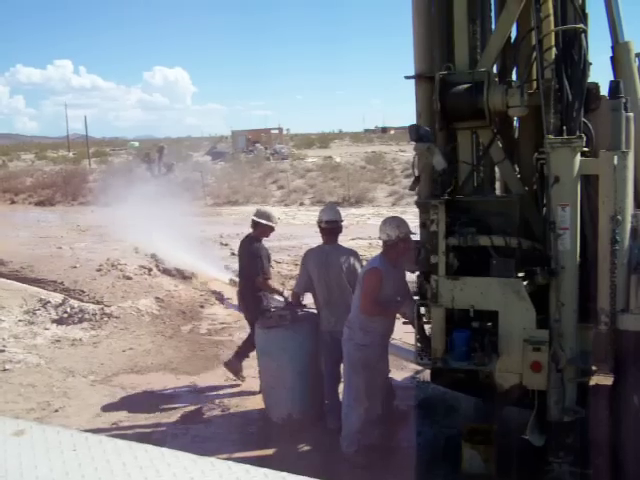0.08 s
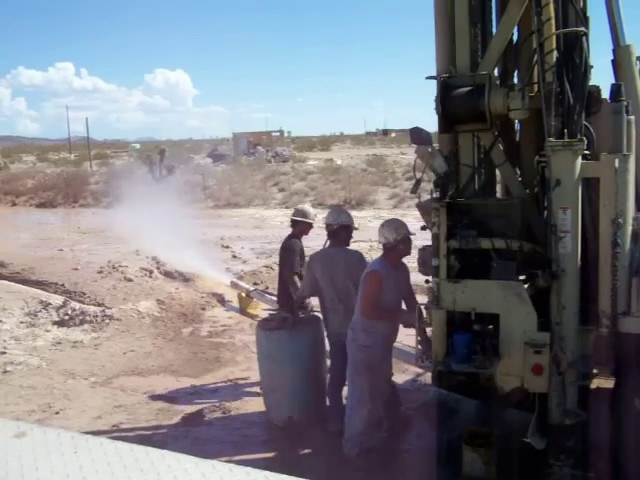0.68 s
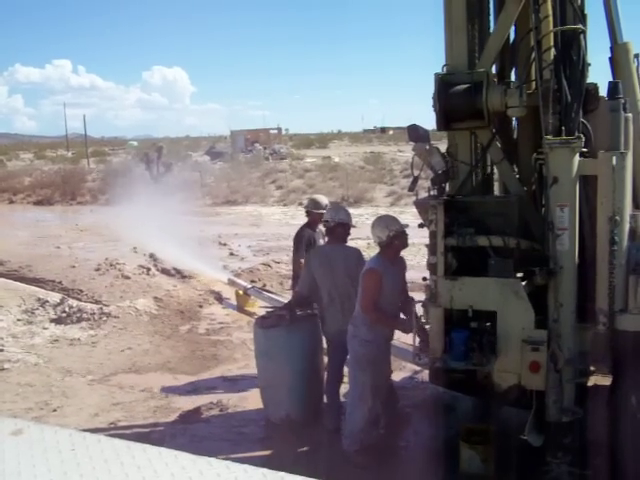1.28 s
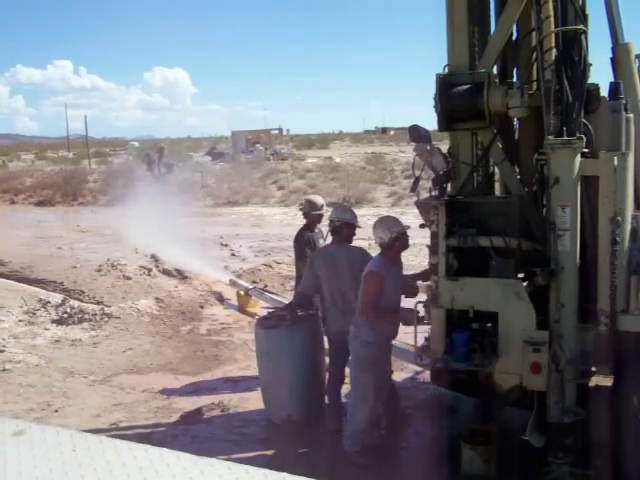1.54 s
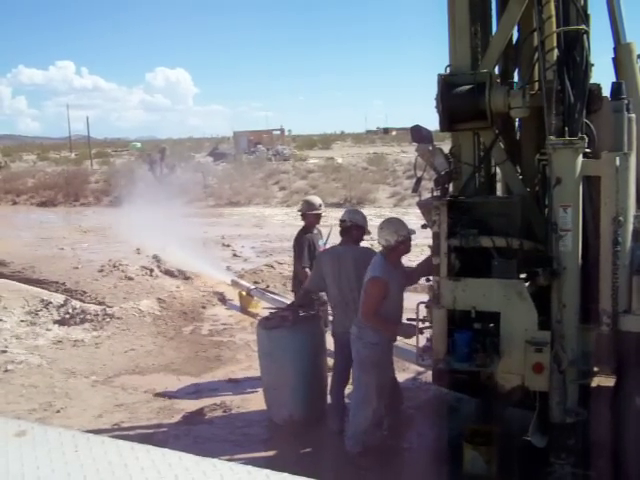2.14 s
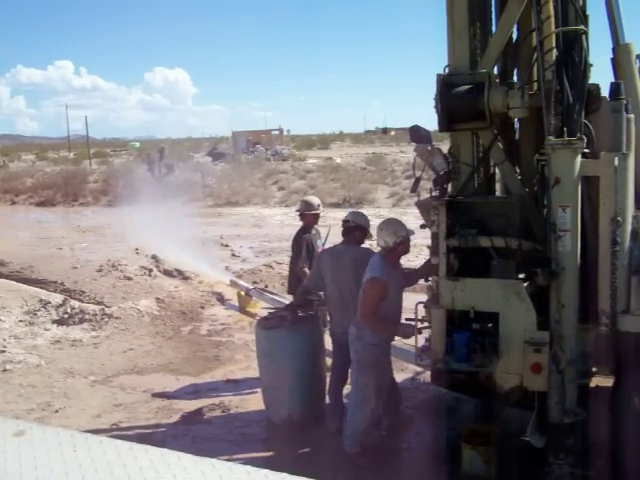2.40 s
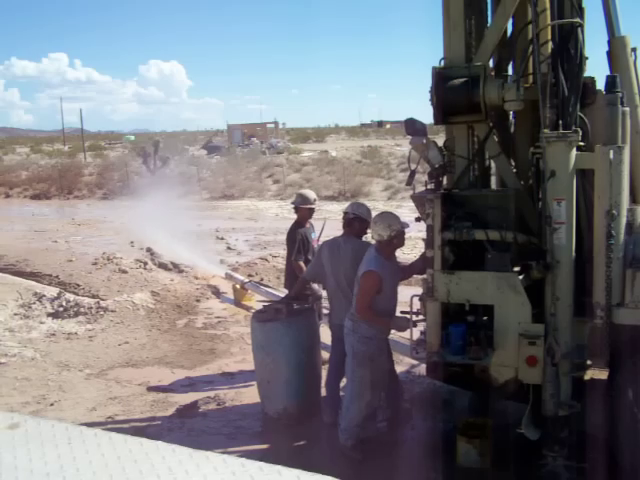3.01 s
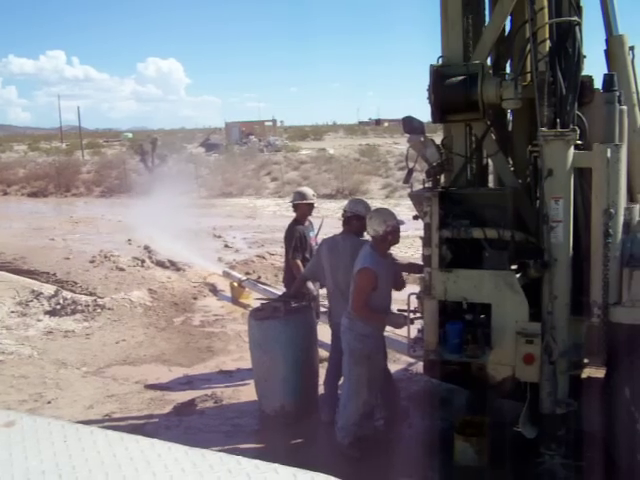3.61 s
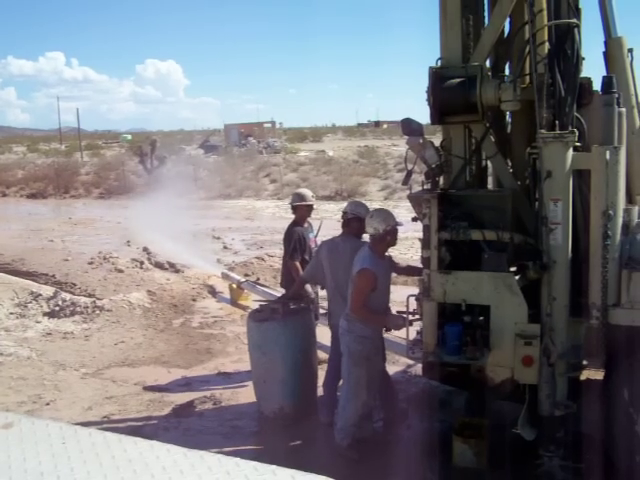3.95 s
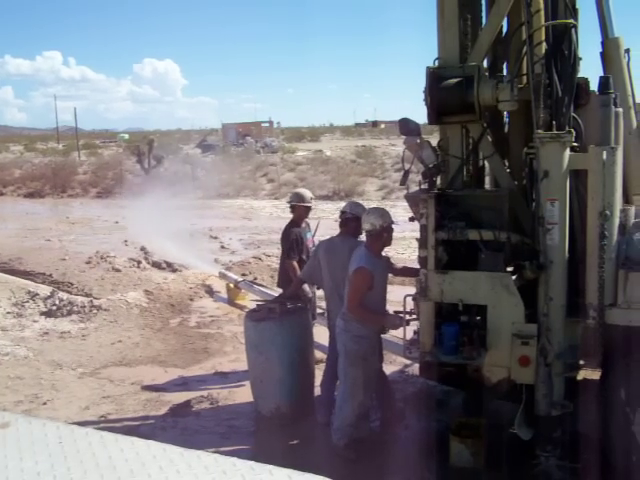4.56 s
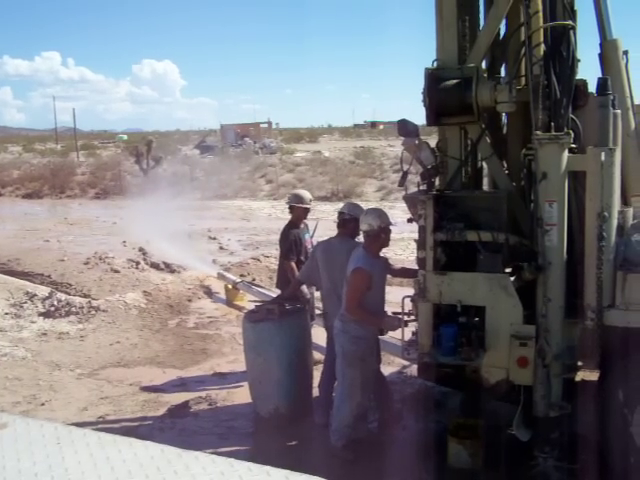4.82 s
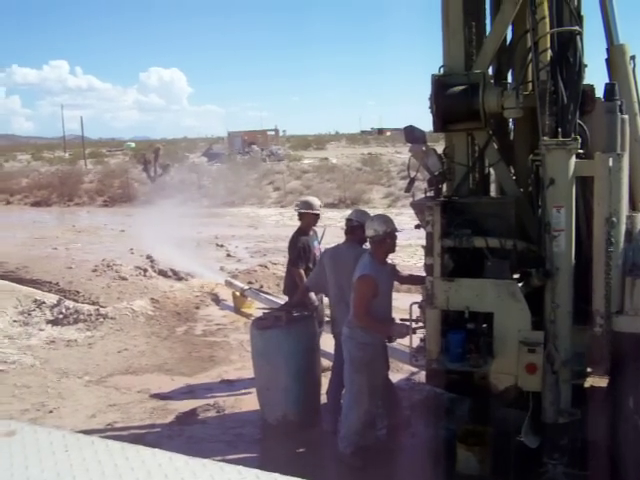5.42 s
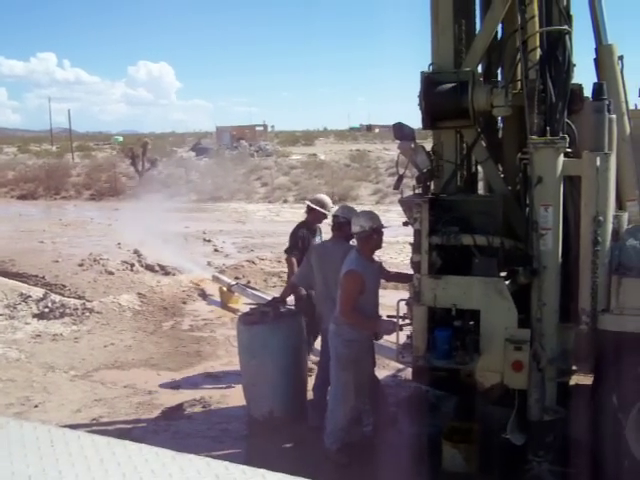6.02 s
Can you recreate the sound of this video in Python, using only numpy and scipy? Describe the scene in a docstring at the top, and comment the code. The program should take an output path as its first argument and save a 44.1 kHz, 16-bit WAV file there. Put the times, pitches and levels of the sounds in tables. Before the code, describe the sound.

A loud rush of compressed air bursts from a drilling rig's pipe shortly after the start, with gushes of gritty water and piercing, broken whistles that lightly strain the microphone. The hiss gradually eases and the whistling drops in pitch, ending with several dull splutters. Underneath, in the open air, a diesel engine and compressor drone on with one steady, high whine of gears.

```python
"""A well drilling rig blowing air

Outdoors, compressed air blows water and dust from a pipe. The air surges, then bleeds down slowly;
the jet whistles, hopping between the pipe's resonances and sinking in pitch. Behind it a diesel engine,
a screw compressor and whining gears run at full speed. The loudest moments overload the microphone."""
import sys
import numpy as np
from scipy import signal
from scipy.fft import rfft, irfft, next_fast_len
from scipy.io import wavfile
from scipy.ndimage import uniform_filter1d

SR = 44100
rng = np.random.default_rng(int(sys.argv[2]) if len(sys.argv) > 2 else 0)


def unload_audio(sound):
    """Save the sound as a 16-bit wav file, at the path given as the first command line argument."""
    columns = np.transpose(np.atleast_2d(sound))
    # keep every value between -1 and 1, then stretch to whole-number steps
    steps = np.round(np.clip(columns, -1, 1) * 32767)
    wavfile.write(sys.argv[1], SR, steps.astype(np.int16))


N = 276507
TIME = np.arange(N) / SR
OPEN_S, OPENING_S = 0.714, 0.07  # when the air valve starts to open, and how long it takes


# The jet's tone colour at full and at low pressure. Each row: frequency in Hz, relative level in dB.
JET_FULL_COLOUR = [(500, -31), (950, -16), (1080, -6), (1300, -11.5), (1600, -7.5), (2200, -4.5),
                   (2750, -7.5), (3300, -1.5), (3900, 0), (4800, -5), (5500, -10.5), (5850, -12),
                   (7200, -19.5), (8800, -39)]
JET_LOW_COLOUR = [(500, -32), (950, -21), (1080, -9.5), (1300, -5), (1600, -4.5), (2100, -2), (2700, -7),
                  (3200, -0.5), (3700, 1.5), (4800, -6.5), (5450, -11.5), (5850, -15.5), (7200, -22.5),
                  (8800, -39)]
# The pipe's broad resonances (the pitches it boosts). Each row: centre in Hz, width in Hz, boost in dB.
PIPE_RESONANCES = [(3580, 130, 1), (4300, 270, 1), (5350, 160, 3.5), (6950, 430, 1.5)]
# The jet's main resonance wavers, then sinks with the pressure. Each row: time in seconds, pitch in Hz.
JET_PITCH = [(0.8, 2595), (1.15, 2480), (1.45, 2700), (2.7, 2680), (3.45, 2550), (5.3, 2245), (6.27, 2120)]
# Peaks and dips that move with it. Each row: offset from that pitch in Hz, width in Hz, gain in dB.
JET_RESONANCES = [(-950, 120, 1), (-400, 100, 4), (-200, 110, -1), (0.5, 120, 3.5), (194.5, 160, 0.5),
                  (399, 160, 1.5)]

def jet(gain_db=2.0, patchy_db=1.0, sputter_db=0.12):
    """Turbulent air hisses through the pipe's resonances; its tone colour shifts with the pressure."""
    hz = np.fft.rfftfreq(1024, 1 / SR)
    frame_s = np.arange(N // 256 + 5) * 256 / SR
    real, imag, patches = rng.standard_normal((3, len(frame_s), len(hz)))
    pressure = np.interp(blast_db(frame_s), [-24, -16], [0, 1])[:, None]  # 0 is low, 1 is full
    colour_db = pressure * level_at(JET_FULL_COLOUR, hz) + (1 - pressure) * level_at(JET_LOW_COLOUR, hz)
    colour_db += resonance_db(PIPE_RESONANCES, hz)
    opened = (frame_s > OPEN_S)[:, None]
    colour_db += opened * resonance_db(JET_RESONANCES, hz - follow(JET_PITCH, frame_s)[:, None])
    eddies = unit(uniform_filter1d(uniform_filter1d(patches, size=12, axis=0), size=7, axis=1))
    spectrum = (real + 1j * imag) * amp(colour_db + patchy_db * eddies)
    hiss = signal.istft(spectrum.T, nperseg=1024, noverlap=768)[1][:N]
    return unit(hiss) * amp(gain_db + blast_db(TIME) + sputter_db * wander(40))


def blast_db(t, idle_db=-24, peak_db=-15.5, creep_db=0.8, creep_s=0.77, bleed_db_per_s=2.33):
    """The air's strength jumps as the valve opens, creeps up to a peak, then bleeds down steadily."""
    past_peak_s = t - OPEN_S - OPENING_S - creep_s
    open_db = peak_db + np.minimum(creep_db * past_peak_s / creep_s, -bleed_db_per_s * past_peak_s)
    return idle_db + (open_db - idle_db) * opening(t)


def opening(t):
    """How far the air valve has opened, from 0 to 1."""
    return np.clip((t - OPEN_S) / OPENING_S, 0, 1)


# The jet's whistles. Each row: start and end in seconds, starting pitch in Hz, pitch drop in Hz per
# second, relative level in dB, swell time and fade time in seconds.
WHISTLE_NOTES = [ (0.733, 0.797, 2256, 148, -12.5, 0.03, 0.02), (0.778, 0.90, 2594, -2, -16.5, 0.015, 0.08),
                 (1.02, 1.14, 2124, 30, -21, 0.025, 0.09), (1.485, 1.699, 2724, 0, -12.5, 0.03, 0.025),
                 (1.70, 2.104, 2728, 31.5, -10, 0.045, 0.005), (2.08, 2.281, 2300, 147, -18.5, 0.061, 0.1),
                 (2.11, 2.73, 2700, 64.5, -24, 0.02, 0.04), (2.66, 2.75, 3050, -3, -18, 0.028, 0.038),
                 (2.705, 3.335, 2233, 57.5, -12.7, 0.057, 0.15),
                 (3.26, 3.47, 2970, -120, -22.5, 0.02, 0.08), (3.335, 3.48, 2183, 150, -20, 0.045, 0.09),
                 (3.43, 3.74, 2500, 72, -18.5, 0.025, 0.1), (3.72, 4.2, 2470, 20, -17.5, 0.16, 0.19),
                 (4.129, 4.57, 2453, 104, -19, 0.1, 0.13), (4.635, 4.84, 2364, 100, -21, 0.02, 0.19),
                 (4.84, 5.36, 2340, 59.5, -22.7, 0.2, 0.018), (5.36, 5.82, 2300, 170, -23.5, 0.02, 0.35)]
# Brief dips in the whistling. Each row: middle in seconds, half length in seconds, depth in dB.
WHISTLE_DIPS = [(1.627, 0.026, 10), (1.932, 0.01, 7), (2.38, 0.06, 4), (2.807, 0.023, 5.5),
                (2.945, 0.041, 8), (3.044, 0.012, 13)]

def whistles(gain_db=-1.46, swell_db=8, build_db=3, pure_above_db=-15.5, octave_cap_db=-16.0, edge_s=0.007):
    """Swirls of air lock onto one pipe resonance after another; turbulence shakes the weaker notes."""
    shake, flutter, octave_drift = wander(97), wander(45), wander(40)
    bend = 0.0015 * wander(12)
    octave_gain = amp(-15.5 + 2 * wander(10))
    dip_db = sum(db * np.exp(-((TIME - s) / half_s) ** 2) for s, half_s, db in WHISTLE_DIPS)
    out = np.zeros(N)
    for start, end, hz, drop, db, swell_s, fade_s in WHISTLE_NOTES:
        on = (TIME > start) & (TIME < end)
        age, left = TIME[on] - start, end - TIME[on]
        grown = np.clip(np.minimum(age / swell_s, left / fade_s), 0, 1)
        note_db = db - swell_db * (1 - grown) - build_db * left / (end - start) - dip_db[on]
        weak = np.clip((pure_above_db - note_db) / 12, 0, 1)  # 0 is pure, 1 is shaky
        jitter = .0018 + .003 * weak
        flutter_db = (0.03 + 3.0 * weak) * flutter[on]
        angle = phase((hz - drop * age) * (1 + bend[on] + jitter * shake[on]))
        tone = amp(note_db + flutter_db - 2 * weak) * np.sin(angle)
        octave = octave_gain[on] * np.sin(2 * angle + .5 * octave_drift[on])
        gate = np.clip(np.minimum(age, left) / edge_s, 0, 1)
        out[on] += gate * (tone + amp(np.minimum(note_db, octave_cap_db)) * octave)
    return np.sqrt(2) * amp(gain_db) * out


# The spray's tone colour. Each row: frequency in Hz, relative level in dB.
SPRAY_TONE = [(250, -21), (450, -10), (680, 1), (1080, -2), (1500, -2.5), (2100, -4), (3500, -17),
              (8000, -45)]
# Gushes of water and grit. Each row: start in seconds, level in dB, decay time in seconds.
SPRAY_GUSHES = [(0.55, -27.5, 0.3), (0.76, -28, 0.1), (0.98, -30.5, 0.3), (1.27, -23, 0.19),
                (1.51, -24.5, 0.06)]

def spray(steady_db=-30.5, drops_per_s=5000, spread_db=0.5, rise_s=0.064):
    """Thousands of drops and grains a second merge into a coarse rush, with a few early gushes."""
    drops = rng.standard_normal(N) * (rng.random(N) < drops_per_s / SR)
    sizes = amp(spread_db * np.minimum(rng.exponential(1, N), 4))
    gush_power = sum((amp(db) * burst(s, rise_s, decay_s)) ** 2 for s, db, decay_s in SPRAY_GUSHES)
    return coloured(drops * sizes, SPRAY_TONE) * np.sqrt(amp(steady_db) ** 2 + gush_power)


# Lumps of water spat from the pipe. Each row: start in seconds, level in dB.
SPLUTTERS = [(1.325, -20), (6.02, -22), (6.095, -22.5), (6.145, -19.5), (6.2, -22.5)]
# Their tone colour. Each row: frequency in Hz, relative level in dB.
SPLUTTER_TONE = [(120, -24), (280, -1.5), (450, -4), (600, -8), (740, 2), (900, -5), (1200, 0), (2000, -15),
                 (3300, -8.5), (6000, -18), (8800, -39)]

def splutters(rise_s=0.0061, decay_s=0.018):
    """Each lump of water bursts into a short, dull splutter."""
    bursts = sum(amp(db) * burst(s, rise_s, decay_s) for s, db in SPLUTTERS)
    return bursts * coloured(rng.standard_normal(N), SPLUTTER_TONE)


def valve(hz=6160, peak_db=-38.5, swell_db_per_s=9.0, hiss_db=-35.5, jitter=0.0012, drift=0.002):
    """Air squeezes through the nearly shut valve: a thin whistle swells in a high hiss until it opens."""
    pitch = hz * (1 + jitter * wander(65) + drift * wander(5))
    tone = np.sqrt(2) * np.sin(phase(pitch))
    tone_db = peak_db - swell_db_per_s * np.maximum(OPEN_S - TIME, 0)
    hiss_colour = [(3000, -29.5), (4800, 2.5), (6200, 2), (7200, -9.0), (8800, -27.0)]  # Hz, dB
    hiss = coloured(rng.standard_normal(N), hiss_colour)
    return (1 - opening(TIME)) * (amp(tone_db) * tone + amp(hiss_db) * hiss)


# How loud the gears whine. Each row: time in seconds, relative level in dB.
WHINE_LEVELS = [(0.2, -25.5), (0.26, -24), (1.02, -26.5), (1.22, -25), (2.01, -31), (2.24, -28),
                (2.55, -30.5), (3.17, -25.5), (5.89, -25), (6.1, -24.5)]

def gear_whine(hz=1366.1, rise_hz_per_s=0.5, gain_db=1.07, flutter_db=0.16, upper_db=-40.5):
    """Meshing gear teeth sing one clean tone, with a faint second tone a fifth above."""
    angle = phase((hz + rise_hz_per_s * TIME) * (1 + .0007 * wander(30)))
    tone = amp(gain_db + follow(WHINE_LEVELS, TIME) + flutter_db * wander(28)) * np.sin(angle)
    upper = amp(upper_db + 3 * wander(5)) * np.sin(1.498 * angle + .7 * wander(15))
    return np.sqrt(2) * (tone + upper)


CRANK_HZ = 36.57  # turns of the engine's crankshaft each second
# The engine's tones. Each row: multiple of the crankshaft speed, relative level in dB.
DIESEL_TONES = [(1, -64), (1.5, -58), (2, -56.5), (2.5, -61.5), (3, -42.5), (3.5, -49.5), (4, -43),
                (4.5, -45), (5, -39.5), (5.5, -45.5), (6, -40), (7, -42), (8, -42), (9, -42.5),
                (9.5, -46.5), (10, -43.5), (12, -45.5), (14.43, -43)]

def diesel():
    """The engine's firing pulses make a steady, low drone."""
    return shaft(CRANK_HZ, DIESEL_TONES, gain_db=-2.5, drift=0.00093, uneven=.15, smear=1.42)


# The compressor's tones. Each row: multiple of the pulse rate, relative level in dB.
COMPRESSOR_TONES = [(1, -43), (2, -42), (4, -50), (5, -43), (6, -40.5)]

def compressor(pulse_hz=150.4):
    """Each ridge of the turning screws pushes out a pulse of air; together they hum."""
    return shaft(pulse_hz, COMPRESSOR_TONES, gain_db=-3.5, drift=0.00084, uneven=0.23, smear=2.52)


def shaft(hz, tones, gain_db, drift, uneven, smear):
    """A steady shaft's pulses as a stack of tones; the housing smears their timing and each one strays."""
    angle = phase(hz * (1 + drift * wander(1.76)))
    out = np.zeros(N)
    for multiple, db in tones:
        stray = 1 + uneven * (wander(8.0) + 1j * wander(5.6))  # wobbles both level and timing
        tone = np.exp(1j * (multiple * angle + smear * rng.standard_normal()))
        out += amp(db) * (stray * tone).real
    return np.sqrt(2) * amp(gain_db) * out


# The tone colour of the machinery's clatter and fan. Each row: frequency in Hz, relative level in dB.
ROAR_TONE = [(22, -32.5), (45, -19.5), (90, -16), (150, -8.5), (230, 1), (290, 5), (350, 2.5), (500, 3.5),
             (900, -3.5), (2000, -2.5), (5000, -41)]

def roar(level_db=-33.0, throb=0.2):
    """Fan and engine noise throbs with the three firings of each crankshaft turn."""
    firing = np.cos(2 * np.pi * 3 * CRANK_HZ * TIME)
    return amp(level_db) * coloured(rng.standard_normal(N) * (1 + throb * firing), ROAR_TONE)


def amp(db):
    """Turns decibels into a multiplier."""
    return 10 ** (np.asarray(db) / 20)


def unit(x):
    """Scales a signal to an average (rms) level of 1."""
    return x / np.sqrt(np.mean(x ** 2) + 1e-20)


def level_at(colour, hz):
    """A tone colour's level in dB at the given frequencies."""
    row_hz, db = np.transpose(colour)
    return np.interp(np.log(hz + 1), np.log(row_hz + 1), db)


def follow(rows, t):
    """Joins (time, value) rows with straight lines and reads them at the times t."""
    times, values = np.transpose(rows)
    return np.interp(t, times, values)


def coloured(x, colour):
    """Gives a signal a tone colour, at an average level of 1."""
    size = next_fast_len(N)
    gain = amp(level_at(colour, np.fft.rfftfreq(size, 1 / SR)))
    return unit(irfft(rfft(x, size) * gain, size)[:N])


def resonance_db(peaks, hz):
    """Gain in dB of a few bell-shaped resonances."""
    return sum(db * np.exp(-2 * ((hz - centre) / width) ** 2) for centre, width, db in peaks)


def wander(hz):
    """A smooth random wobble that moves up to about hz times a second."""
    size = next_fast_len(N)
    freqs = np.fft.rfftfreq(size, 1 / SR)
    return unit(irfft(rfft(rng.standard_normal(size)) / (1 + (freqs / hz) ** 4), size)[:N])


def phase(hz):
    """The running angle of a wave whose pitch changes, from a random start."""
    return 2 * np.pi * (np.cumsum(hz) / SR + rng.random())


def burst(start_s, rise_s, decay_s):
    """A loudness shape that rises in a straight line, then dies away."""
    age = np.maximum(TIME - start_s, 0)
    return np.minimum(age / rise_s, 1) * np.exp(-np.maximum(age - rise_s, 0) / decay_s)


def scene():
    """The machinery and the blowing pipe in open air, in one channel."""
    drone = diesel() + compressor()
    air = jet() + spray() + splutters() + valve() + whistles()
    return (air + gear_whine() + drone + roar())[None]


def record(dry, drive_db=0.66, ceiling=.58, cutoff_hz=8480):
    """The microphone rounds off the highest peaks; then a filter removes the top treble."""
    driven = dry * amp(drive_db)
    rounded = driven / (1 + (driven / ceiling) ** 8) ** (1 / 8)
    low_pass = signal.firwin(121, cutoff_hz, window=("kaiser", 9), fs=SR)
    return signal.oaconvolve(rounded, low_pass[None], "same")


dry = scene()
out = record(dry)
unload_audio(out)
```